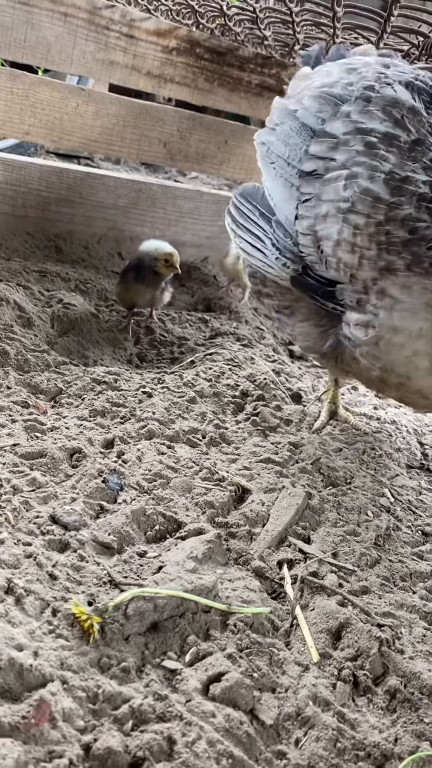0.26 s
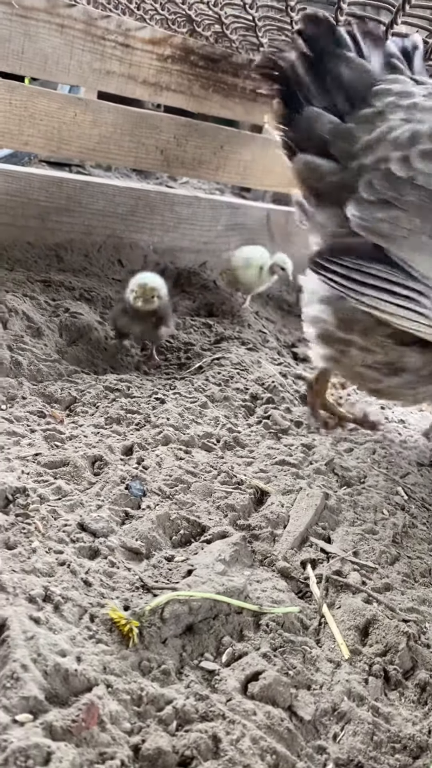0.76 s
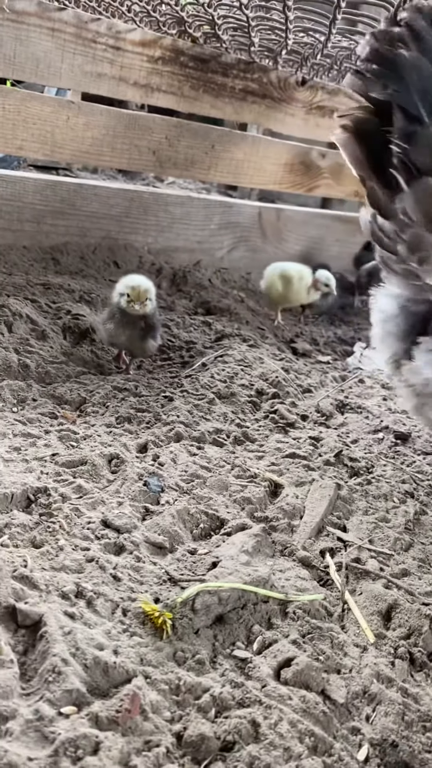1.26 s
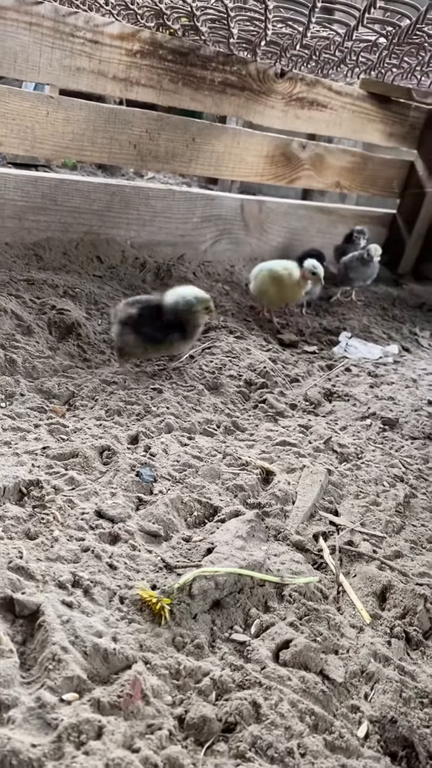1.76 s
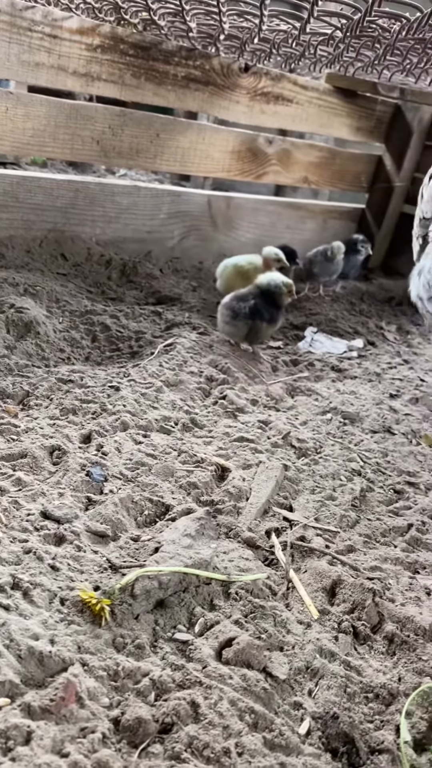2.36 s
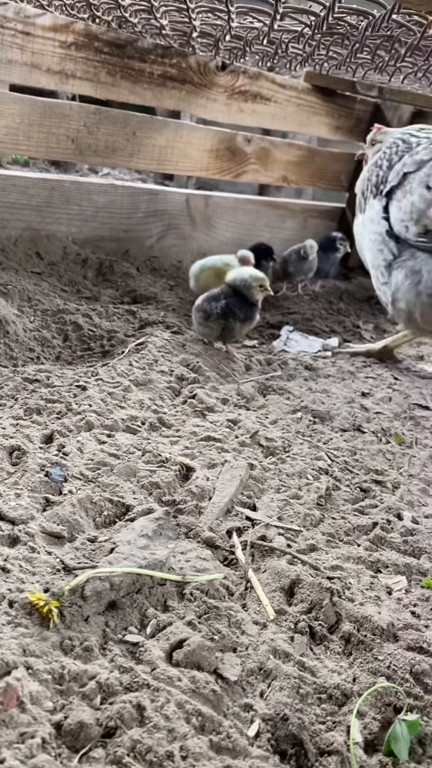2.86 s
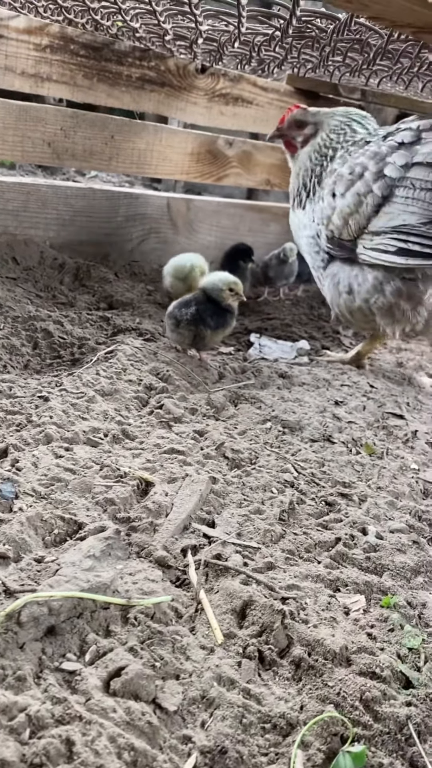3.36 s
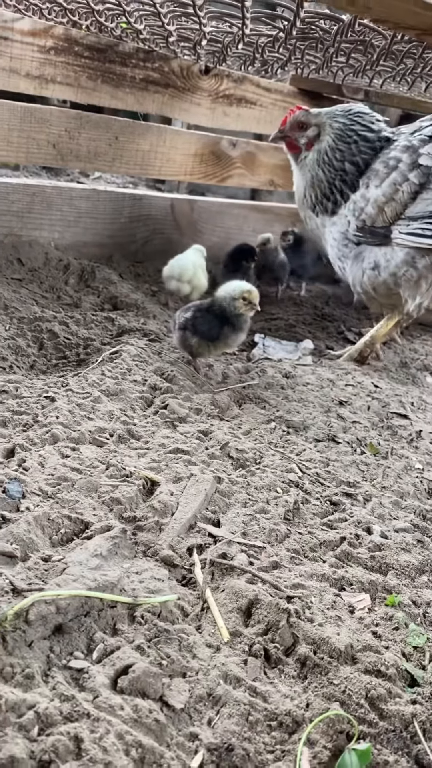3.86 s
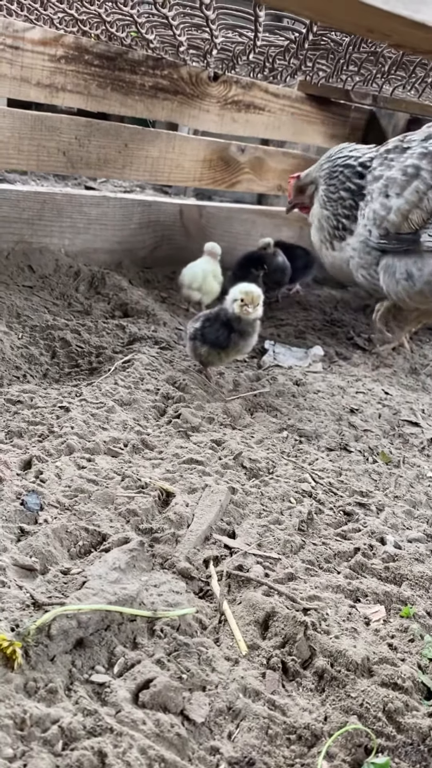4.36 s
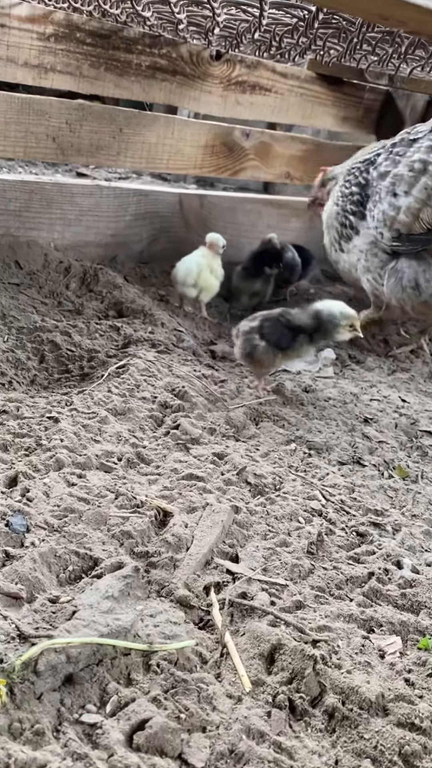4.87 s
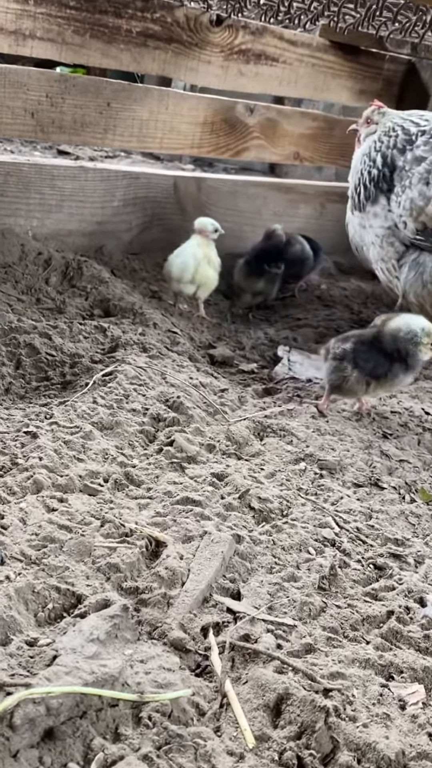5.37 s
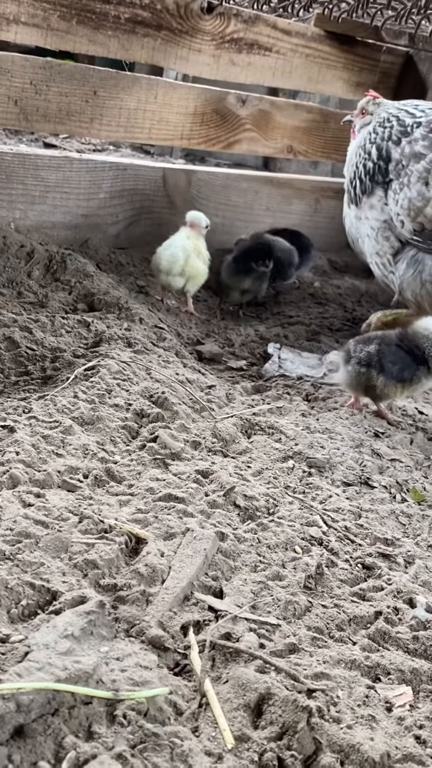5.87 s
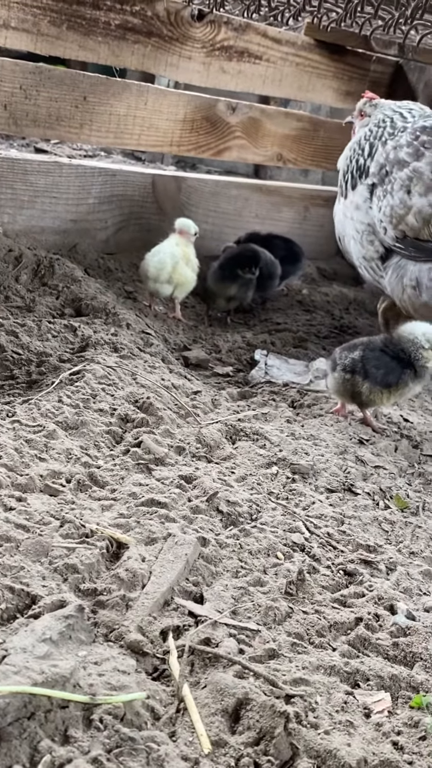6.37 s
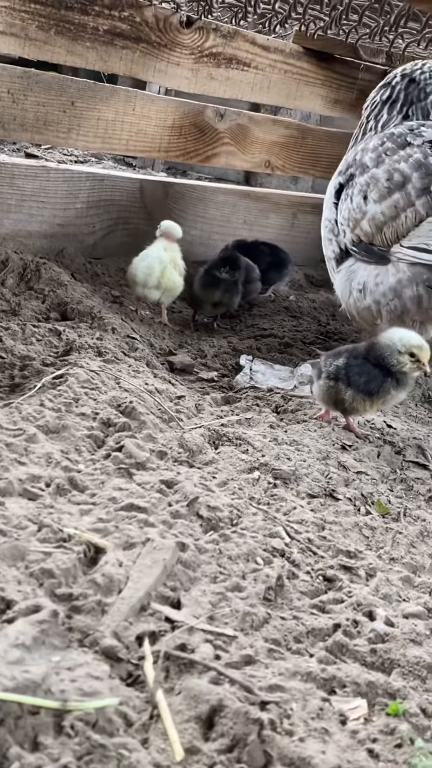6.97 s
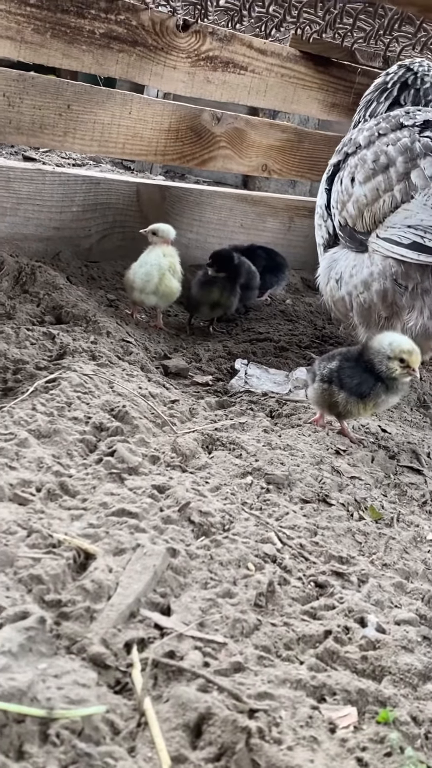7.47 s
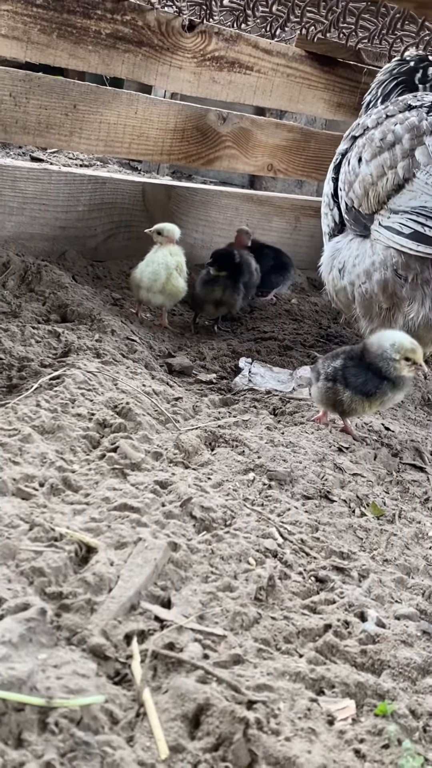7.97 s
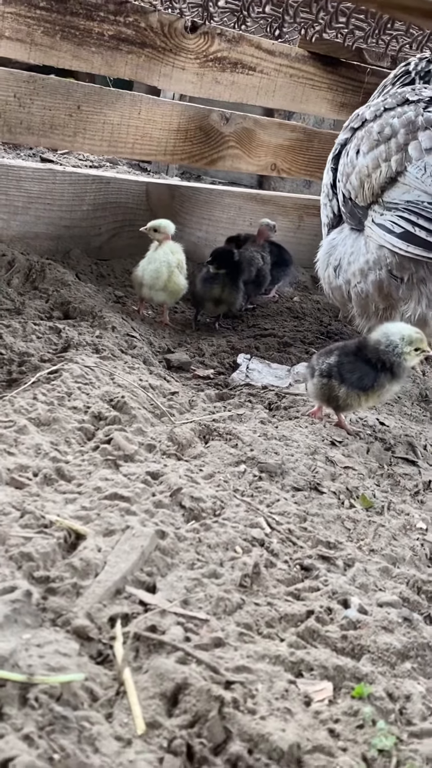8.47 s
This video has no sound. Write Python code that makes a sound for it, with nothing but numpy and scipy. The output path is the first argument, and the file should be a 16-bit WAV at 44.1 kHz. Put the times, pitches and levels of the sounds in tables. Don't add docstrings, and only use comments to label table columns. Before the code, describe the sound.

From 0 to 1.9 seconds, chicks close to the microphone make brief high trills, upward flicks and quick scooping chirps, mixed with crisp beak pecks on dry grit and small claw knocks, over soft airy yard noise. Around 1.6 to 2.0 seconds, dull toe taps cross the sand. From 2 to 3.5 seconds come piercing, slightly raspy falling cries, leaning left, with short reflections from the boards. The sound fades to silence by about 3.7. At 4.35 a different ambience cuts in: deep wind rumble and a very faint motor hum. A hen clucks low and throaty from 4.4, repeatedly until about 8.3, while chicks call in falling arches on the right. A distant rooster crows faintly near 4.6 and 8.0. Peeping thickens after 6, sand scratches softly, and from 7.6 a faint crowd of chicks joins until the end at about 8.7.

```python
import sys
import numpy as np
from scipy import signal
from scipy.io import wavfile
from scipy.ndimage import uniform_filter1d

SR = 44100
rng = np.random.default_rng(int(sys.argv[2]) if len(sys.argv) > 2 else 0)


def voltage_ratio(level):
    return 10 ** (np.asarray(level, float) / 20)


def master(y):
    cut = np.clip(np.atleast_2d(y).T, -1, 1)
    pcm = np.round(cut * 32767)
    wavfile.write(sys.argv[1], SR, pcm.astype(np.int16))


N = 384993
SPLICE_S = 4.0

# start_s, glide_length_s, from_hz, to_hz, level_db
TRILLS = [(.026, 0.033, 3586, 3650, -23), (.941, .037, 3540, 3613, -19.5)]
WARBLES = [(.167, .018, 2760, 3000, -36)]
WHISTLES = [(.527, .041, 3215, 3270, -28)]
CLIMBS = [(.742, 0.056, 3300, 4210, -23.5)]
FLICKS = [(.104, 0.0024, 2350, 2420, -31), (.375, 0.028, 2970, 2558, -18), (.496, 0.026, 3140, 2990, -32.5),
          (.664, 0.023, 3600, 3500, -40), (1.756, 0.031, 2990, 2706, -27.5)]
LEAPS = [(1.056, 0.0067, 2630, 2196, -29), (1.212, 0.024, 3160, 3220, -31.5),
         (1.279, 0.0028, 2730, 2780, -44.5)]
DIPS = [(2.2, .034, 2750, 3350, -38), (0.93, .01, 2750, 3600, -30), (1.05, .009, 3600, 3200, -36)]
SCOOPS = [(1.848, 0.031, 3720, 2720, -21.5), (.69, 0.033, 3430, 2640, -34.5),
          (.918, 0.041, 4000, 2680, -31.5)]
CURLS = [(2.428, .036, 2850, 3350, -43), (1.04, .012, 2900, 3600, -38)]
SHOULDERS = [(2.184, .052, 3410, 2760, -30), (2.369, .055, 3740, 2800, -30.5)]
STEPS = [(3.005, 0.08, 5500, 2690, -27.5)]
SIGHS = [(2.012, 0.023, 3300, 2580, -16)]
CRIES = [(2.75, 0.1, 4620, 3663, -20), (3.065, .1, 4614, 3614, -21), (3.365, 0.12, 4590, 3623, -27)]
FIRST_CRIES = [(2.175, 0.086, 4557, 3607, -17), (2.455, .098, 4635, 3588, -17)]
SWOOPS = [(2.098, .067, 5100, 2950, -29.5)]
PLAINTS = [(1.966, .066, 3720, 3380, -17)]
PURRS = [(1.716, 0.034, 3000, 2950, -39)]
HAZE = [(8.21, .07, 4500, 4400, -50), (8.24, .06, 4250, 4150, -50), (7.74, .04, 4400, 4300, -40),
        (.775, .03, 4200, 4550, -40)]
WHINES = [(2.87, 0.043, 3800, 3044, -29)]
# start_s, glide_length_s, from_hz, to_hz, level_db
BROKEN_ARCHES = [(7.152, .157, 4250, 2280, -25)]
HOOKS = [(6.525, 0.095, 3980, 2810, -29), (7.648, .075, 3470, 2700, -34)]
ARCHES = [(6.745, 0.1118, 3900, 2300, -25), (5.748, 0.122, 4320, 2300, -28)]
BOWS = [(4.875, 0.11, 4070, 2374, -28), (7.42, 0.11, 3926, 2234, -24.5), (7.731, .107, 4114, 2480, -25)]
FAR_ARCHES = [(4.385, 0.12, 4400, 3000, -58), (8.495, .088, 4000, 2480, -39)]
FAR_BOWS = [(5.435, 0.135, 3400, 2530, -39.5), (5.675, 0.14, 3680, 2520, -35.5),
            (8.33, 0.11, 3640, 2200, -32)]
LEDGES = [(4.639, .098, 3900, 2690, -30), (5.466, .13, 4230, 2600, -31)]
PIPS = [(6.067, 0.075, 3650, 2880, -37), (6.212, 0.08, 3680, 2900, -36), (7.036, .068, 3540, 2950, -38),
        (6.906, .058, 2860, 2480, -32), (8.083, .068, 3580, 2240, -32), (6.674, .052, 3520, 2420, -32),
        (6.41, .04, 3320, 2680, -33), (6.533, .046, 3420, 2740, -31)]
RISES = [(4.455, .055, 2480, 2800, -43), (6.765, .042, 2540, 2700, -29), (6.74, .012, 2400, 3500, -36),
         (7.82, .05, 3800, 4100, -38), (8.705, .022, 3200, 3750, -36), (8.645, .035, 3500, 3480, -40)]
SLIDES = [(8.43, .11, 4300, 2350, -35), (8.612, .094, 4400, 2280, -31), (8.105, .105, 4180, 2300, -29)]
LOW_SCOOPS = [(6.507, .04, 3050, 2480, -32.5), (8.578, .075, 3350, 2620, -37),
              (8.304, .052, 2950, 2450, -30.5)]
CHIRPS = [(4.348, 0.04, 2650, 2560, -34), (4.505, .03, 2800, 2620, -41), (7.164, 0.045, 3000, 2680, -31),
          (7.326, 0.04, 3130, 2700, -34.5), (7.385, 0.12, 3350, 2850, -41), (7.669, 0.025, 3890, 3600, -38),
          (7.75, 0.05, 3300, 2400, -30), (7.7, 0.03, 3550, 3180, -34), (7.868, 0.056, 3760, 3110, -29),
          (7.937, 0.048, 3350, 2600, -33), (8.0, .04, 3250, 2700, -40), (8.195, 0.058, 3780, 2800, -31),
          (8.272, 0.03, 3300, 2164, -37), (8.358, .034, 3150, 2480, -34), (8.458, .034, 3120, 2494, -39),
          (8.308, .045, 3900, 3250, -35)]
FADES = [(6.47, .03, 2500, 3300, -39.5), (5.755, .025, 2610, 2730, -35.5), (7.535, 0.07, 2830, 2780, -38),
         (7.927, 0.043, 2700, 2150, -28), (8.246, 0.032, 2720, 2230, -29), (6.7, .04, 3100, 2760, -48)]
# share_of_length, share_of_way_between_pitches, level_db
EVEN = [(0, 0.088, -6), (.4, 0.47, -3), (1, 0.96, -0.5)]
SWELL = [(0, 0, -26), (.3, .22, -24), (.38, .32, -8.5), (.6, .5, -7), (.8, .66, -5), (1, 0.96, 1.5)]
HUMP = [(0, 0, -13), (.5, 0.54, -2), (0.998, 1, -9)]
DYING = [(0, 0, -3), (0.398, .45, -3), (1, 1, -18.5)]
EARLY_TOP = [(0, .6, -13), (.08, .12, -7), (.2, 0.014, -6), (.64, .33, -1.5), (1, 0.97, -1.5)]
LATE_TOP = [(0, .45, -15), (.1, 0.079, -8), (.36, 0.012, -6.5), (.7, .36, -2.5), (1, 0.99, -5)]
TALL_TOP = [(0, .85, -12), (.1, .15, -6), (.22, 0, -4), (.64, .45, -1), (1, 1, -4)]
ROUND_TOP = [(0, .12, -9.5), (.22, 0.025, -3.5), (1, 1, -0.5)]
STAIR = [(0, 0, -10), (.18, .4, 0), (.5, 0.42, -5), (1, 1, -10)]
SWOOP = [(0, 0, -30.5), (.2, .44, -5), (.6, .66, 1), (1, 1, -5)]
STEP_DOWN = [(0, 0.04, -30), (.47, .43, -18), (.57, .64, -1.5), (.75, .75, 0), (1, 1, -6)]
SHOULDER = [(0, 0.018, -2.5), (.75, .38, 0.5), (1, 1, -5.5)]
SCOOP = [(0, 0, -13), (.3, .55, -1), (.55, .85, 0.5), (1, 1, -11)]
SLIDE = [(0, 0, -7), (.2, .1, -5), (.65, .38, -3), (1, 1, -1)]
PLAINT = [(0, 0, -10), (.2, .25, -3), (.4, .45, -7), (.75, .75, 0), (1, 1, -5)]
BROKEN = [(0, .6, -13), (.09, 0, -7), (.32, .13, -2), (.47, .24, -7), (.53, .3, -20), (.6, .35, -2),
          (.7, .45, 0), (.82, .7, -2), (1, 1, -4)]
CURL = [(0, .1, -6), (.5, 0, -2), (1, 1, 0)]
# time_after_glide_s, step_from_last_pitch_hz, level_db
FLICK_AND_DROP = [(.013, 748, -8), (.019, 497, -7.5), (0.029, -800, -9)]
FLICK = [(.013, 752, -1.5), (0.02, 595, -6)]
LEAP = [(.012, 1300, -6), (.018, 1050, -14)]
PLUNGE = [(.008, -450, -5.5), (.019, -1150, -8.5), (.034, -1450, -22)]
SHORT_PLUNGE = [(.008, -500, -5), (.017, -1030, -9.5), (.034, -1200, -24)]
HOOK = [(.02, -170, -2.5), (.045, -330, -11)]
STOP = [(.01, -46, -26)]
UPTURN = [(0.019, 39.7, -29)]
DROP = [(.012, -800, -13)]
LEDGE = [(.018, 30, -2), (.04, -150, -4), (.048, -200, -22)]
SAG = [(.008, -200, -9), (.02, -560, -15), (.032, -620, -28)]

TRILL, CRY, LATER, FALL = range(4)
# octave_partial_db, pitch_shiver_rad, send_to_boards_db
KINDS = [
    (-28.5, 0.062, -12),
    (-7.5, 0.15, 0),
    (-21.5, 0.24, -3.5),
    (-17, .08, -7),
]
THIRD_DB = (-4.5, -26, -23, -21.5)
# pitch_hz, slope_hz_per_db
BEAK_HZ, BEAK_HZ_PER_DB = (3000, 2800, 3300, 3300), (80.0, 200.0, 61, 120.0)
OVERTONE_SPREAD_DB = (2.5, 1.2, 3.5, 1.5)
# delay_s, level_db
SLAPS = [(0.0036, -21.5), (.0065, -9.5), (.005, -9), (.004, -19)]
# calls, glide, ending, kind, left_minus_right_db, second_membrane_beat_depth
FLOCK = [
    (TRILLS, EVEN, FLICK_AND_DROP, TRILL, -1.4, 1.4), (WARBLES, EVEN, FLICK_AND_DROP, TRILL, -1.5, 1.3),
    (WHISTLES, EVEN, FLICK_AND_DROP, TRILL, -2, 0), (CLIMBS, STAIR, DROP, TRILL, -1, 0.32),
    (FLICKS, EVEN, FLICK, TRILL, -1.5, 0), (LEAPS, EVEN, LEAP, TRILL, -1.3, 0),
    (DIPS, HUMP, [], FALL, -1.6, 0), (SCOOPS, SCOOP, [], FALL, -1.6, 0),
    (CURLS, CURL, DROP, TRILL, -2, 0), (BROKEN_ARCHES, BROKEN, STOP, LATER, -16, .45),
    (SHOULDERS, SHOULDER, [], TRILL, -2.5, .3), (STEPS, STEP_DOWN, [], FALL, 12, 0),
    (SIGHS, DYING, [], FALL, -3.5, 0), (CRIES, SWELL, PLUNGE, CRY, 4.1, .6),
    (FIRST_CRIES, SWELL, SHORT_PLUNGE, CRY, 5, .55), (SWOOPS, SWOOP, [], FALL, 13, 0),
    (PLAINTS, PLAINT, SAG, CRY, 9, 0), (PURRS, EVEN, STOP, TRILL, -2, 2.5),
    (HAZE, HUMP, [], LATER, -8, 1.8), (WHINES, HUMP, STOP, FALL, 8.1, 0),
    (HOOKS, EARLY_TOP, HOOK, LATER, -16, 0.71), (ARCHES, EARLY_TOP, STOP, LATER, -16, 0.51),
    (BOWS, LATE_TOP, STOP, LATER, -18, 0.9), (FAR_ARCHES, EARLY_TOP, STOP, LATER, -24, 0),
    (FAR_BOWS, LATE_TOP, STOP, LATER, -14.5, 0), (LEDGES, EARLY_TOP, LEDGE, LATER, -16.5, .64),
    (PIPS, TALL_TOP, STOP, LATER, -19, 0), (RISES, EVEN, STOP, LATER, -18, .3),
    (SLIDES, SLIDE, STOP, LATER, -16, .7), (LOW_SCOOPS, SCOOP, [], LATER, -20, 0),
    (CHIRPS, ROUND_TOP, UPTURN, LATER, -22, 0), (FADES, DYING, [], LATER, -23, 0)]

# start_s, peak_db, length_s
CLUCKS = [(4.44, -43, .05), (4.815, -41, 0.11), (5.04, -36.5, 0.11), (5.277, -37.5, 0.082),
          (5.503, -38.5, 0.071), (5.728, -38.5, 0.088), (5.947, -38.5, 0.16), (6.221, -38.5, 0.07),
          (6.475, -31, 0.094), (6.74, -39.5, 0.064), (7.024, -37.5, 0.2), (7.548, -36, 0.093),
          (7.794, -39.5, 0.17), (7.895, -30.5, 0.16), (7.999, -36, 0.19), (8.138, -36, 0.15)]
# centre_hz, width_hz, level_db
THROAT = [(750, 320, 11.5), (1070, 165, 16.5), (1404, 450, 9.5)]
# start_s, peak_db
TICKS = [(0.404, -41.5), (0.556, -45), (0.7257, -41.5), (0.7934, -34.5), (1.0963, -39), (2.816, -47.5),
         (3.3196, -55), (3.3485, -56.5), (3.5624, -51.5), (3.613, -66), (3.653, -71)]
# start_s, peak_db
RUSTLES = [(0.6175, -56), (1.592, -57), (5.1091, -50), (6.3729, -47), (7.427, -55), (8.05, -56),
           (8.6827, -41.5)]
# start_s, peak_db
PECKS = [(0.0014, -34), (0.0154, -26.5), (0.2223, -34), (0.361, -34), (0.632, -33), (.642, -35),
         (.318, -38), (.282, -41), (0.8297, -32.5), (1.457, -37), (1.5907, -38), (1.6101, -26),
         (1.679, -29.5), (3.3104, -46), (3.6734, -69)]
# start_s, peak_db
TOES = [(1.601, -32), (1.754, -38), (1.887, -37), (1.903, -38.5), (1.944, -43), (2.02, -39.5), (2.039, -33)]
# time_s, level_db
SAND = [(4.347, -70), (5.3, -66), (6.3, -57), (8.73, -54)]
# time_s, pitch_hz, level_db
CROWS = [
    [(4.54, 530, -71), (4.76, 545, -73), (4.8, 592, -62), (4.95, 593, -58.5), (5.12, 590, -62)],
    [(7.97, 657, -58), (8.02, 596, -52), (8.13, 622, -53.5), (8.22, 660, -51.5)],
]
CROW_DB = (0, 7, -4, -2)
# time_s, level_db
YARD = [
    [(0, -50), (2.3, -51), (2.9, -55), (3.3, -60), (3.55, -68), (3.72, -82.5)],
    [(4.345, -56), (4.75, -52.5), (5.4, -50.5), (8.73, -47)],
]
# frequency_hz, density_db_per_hz
AIR = [
    [(18, -40.5), (30, -10.5), (271, -2.5), (413, 0.5), (931, -1.5), (1790, -5), (5540, -8.5), (15800, -13)],
    [(18, -60), (30, -0.5), (566, -12), (645, -6.5), (1060, -7.5), (3540, -14), (3940, -22.5), (12800, -46),
     (15800, -58)],
]
# frequency_hz, likeness
LIKENESS = [(40, 0.5), (85, 0.75), (500, .62), (5000, 0.49), (14000, 0.064)]


def rms_one(x):
    return x / np.sqrt(np.mean(x ** 2) + 1e-20)


def at_hz(points, hz):
    point_hz, values = np.transpose(points)
    return np.interp(np.log(hz), np.log(point_hz), values)


def drift(rate, size):
    step = max(int(SR / rate / 2), 1)
    knots = np.repeat(rng.standard_normal(size // step + 1), step)[:size]
    return np.sqrt(2) * uniform_filter1d(uniform_filter1d(knots, step), step)


def resonance(x, hz, width_hz):
    r = np.exp(-np.pi * width_hz / SR)
    poles = [1, -2 * r * np.cos(2 * np.pi * hz / SR), r * r]
    return signal.lfilter([(1 - r * r) / 2, 0, (r * r - 1) / 2], poles, x)


def steep_resonance(x, hz, width_hz):
    return resonance(resonance(x, hz, width_hz), hz, width_hz)


def add(out, s, sound, side_db):
    i = round(s * SR)
    gains = voltage_ratio(np.array([side_db, -side_db]) / 2)
    gains = gains / np.sqrt(np.mean(gains ** 2))
    out[:, i:i + len(sound)] += np.outer(gains, sound[:N - i])


def glide(rows, edge_s, round_s):
    s, hz, db = np.transpose(rows)
    t = np.arange(s[0] - edge_s, s[-1] + edge_s, 1 / SR)
    pitch = uniform_filter1d(np.interp(t, s, hz), int(round_s * SR), mode="nearest")
    ends = np.clip(np.minimum(t - t[0], t[-1] - t) / (2 * edge_s), 0, 1) ** 2
    return t, 2 * np.pi * np.cumsum(pitch) / SR, np.sqrt(2) * voltage_ratio(np.interp(t, s, db)) * ends


def contour(call, way, ending):
    s, length, from_hz, to_hz, db = call
    rows = []
    for share, along, step_db in way:
        rows.append((s + share * length, from_hz + along * (to_hz - from_hz), db + step_db))
    for after, step_hz, step_db in ending:
        rows.append((s + length + after, to_hz + step_hz, db + step_db))
    return rows


def membrane_beat(t, phase, pitch, way, flutter):
    beat_hz = 436 if t[0] < SPLICE_S else 321
    beat = 2 * np.pi * beat_hz * t + 2.0 * drift(59.97, len(t))
    sliding = (pitch.max() - pitch) * (2.4 if way is SWELL else t > t.mean())
    depth = flutter * voltage_ratio(-9.5) * np.clip(1.4 - sliding / 700, 0, 1)
    sidebands = np.sin(phase + beat) + 0.2 * np.sin(phase - beat) + 0.21 * np.sin(phase + 2 * beat)
    octave = np.sin(2 * phase + 2 * beat) + np.sin(2 * phase + 3 * beat)
    return depth * (sidebands + voltage_ratio(-27.0) * octave)


def strained_breath(t, level, call_db):
    rasp_hz, rasp_width_hz, rasp_s, rasp_db = 4740, 520, 0.012, -21
    age = (t - t[0]) / rasp_s
    puff = age * np.exp(1 - age) * voltage_ratio(rasp_db + call_db)
    high_puff = puff * voltage_ratio(-15)
    breath, air = rng.standard_normal((2, len(t)))
    rasp = rms_one(steep_resonance(breath, rasp_hz, rasp_width_hz)) * (puff + level * voltage_ratio(-37))
    hiss = rms_one(steep_resonance(air, 5800, 1700)) * (level * voltage_ratio(-35) + high_puff)
    rasp_octave = rms_one(steep_resonance(air, 2 * rasp_hz, rasp_width_hz)) * high_puff
    return rasp + hiss + rasp_octave


def chick_call(call, way, ending, kind, flutter):
    octave_db, shiver, _ = KINDS[kind]
    t, phase, level = glide(contour(call, way, ending), edge_s=.004, round_s=.006)
    pitch = np.gradient(phase) * SR / (2 * np.pi)
    over_db = octave_db - np.clip(pitch - BEAK_HZ[kind], 0, None) / BEAK_HZ_PER_DB[kind]
    over_db = over_db + OVERTONE_SPREAD_DB[kind] * drift(45, len(t))
    if t[0] > SPLICE_S:
        over_db = over_db + .6 * (call[-1] + 28)
    phase = phase + shiver * drift(300, len(t))
    voice = np.sin(phase) + voltage_ratio(over_db) * np.sin(2 * phase)
    voice += voltage_ratio(over_db + THIRD_DB[kind]) * np.sin(3 * phase)
    voice += membrane_beat(t, phase, pitch, way, flutter)
    voice *= level * voltage_ratio(10.0 * shiver * drift(119.2, len(t)))
    if way is SWELL:
        voice += strained_breath(t, level, call[-1])
    return t[0], voice


def crowd(count):
    chance = rng.uniform(-1, 1, (count, 4))
    s = np.linspace(7.62, 8.66, count) + .025 * chance[:, 0]
    top_hz = 3700 + 450 * chance[:, 1]
    length_s = .06 + .02 * chance[:, 2]
    return np.transpose([s, length_s, top_hz, .72 * top_hz, -51 + 3.5 * chance[:, 3]])


def chicks():
    out, send = np.zeros((2, 2, N))
    far_end = (crowd(count=34), EARLY_TOP, STOP, LATER, -10.0, .8)
    for calls, way, ending, kind, side_db, flutter in FLOCK + [far_end]:
        slap_s, slap_db = SLAPS[kind]
        send_db = KINDS[kind][2]
        for call in calls:
            s, voice = chick_call(call, way, ending, kind, flutter)
            add(out, s, voice, side_db)
            add(out, s + slap_s, voice * voltage_ratio(slap_db), side_db)
            add(send, s, voice * voltage_ratio(send_db), 0)
    return out, send


def hen():
    out = np.zeros((2, N))
    for s, db, length in CLUCKS:
        t = np.arange(0, 1.3 * length, 1 / SR)
        cycles = np.cumsum(208.0 * (1 + 0.024 * drift(39, len(t)))) / SR
        pulses = np.diff(np.floor(cycles), prepend=0)
        source = pulses + 0.07 * rng.standard_normal(len(t))
        voice = np.zeros(len(t))
        for k, (hz, width_hz, gain_db) in enumerate(THROAT):
            voice += (-1) ** k * voltage_ratio(gain_db) * steep_resonance(source, hz, width_hz)
        shape = np.minimum(t / 0.0027, 1) * np.exp(-(t / length) ** 2 * 1.37)
        add(out, s, rms_one(voice) * shape * voltage_ratio(db - 11.0), 1.5)
    return out


def feet():
    out = np.zeros((2, N))
    for s, db in TICKS:
        t = np.arange(0, .02, 1 / SR)
        knock = rng.standard_normal(len(t)) * np.exp(-t / .0012)
        knock = resonance(resonance(knock, 1470, 1800), 2200, 3200) + 0.13 * resonance(knock, 5000, 6000)
        add(out, s, knock / np.abs(knock).max() * voltage_ratio(db + 11.0), -1.5)
    for s, db in RUSTLES:
        t = np.arange(0, .1, 1 / SR)
        grit = rng.standard_normal((2, len(t))) * voltage_ratio(3.4 * drift(700, len(t)))
        shape = np.sin(np.pi * np.sqrt(t / t[-1])) ** 2
        hiss = rms_one(resonance(grit, 3600, 8500)) * shape * voltage_ratio(db + 3.5)
        i = round(s * SR)
        out[:, i:i + len(t)] += hiss[:, :N - i]
    return out


def grit_ticks():
    out, t = np.zeros((2, N)), np.arange(0, .015, 1 / SR)
    for rows, hz, width_hz, decay_s in [(PECKS, 5000, 4500, .0015), (TOES, 800, 1200, .002)]:
        for s, db in rows:
            tick = resonance(rng.standard_normal(len(t)) * np.exp(-t / decay_s), hz, width_hz)
            add(out, s, tick / np.abs(tick).max() * voltage_ratio(db - 3.0), -1.5)
    return out


def wooden_run(x):
    near_t60_s, far_t60_s, far_db = 0.12, .19, -8
    t = np.arange(int(far_t60_s * SR)) / SR
    decay = voltage_ratio(-60 * t / near_t60_s) + voltage_ratio(far_db - 60 * t / far_t60_s)
    tail = rng.standard_normal((2, len(t))) * decay * np.clip(t / 0.0015 - .5, 0, 1)
    tail = signal.lfilter([1], [1, -.45], tail)
    tail /= np.sqrt(np.sum(tail ** 2, axis=1, keepdims=True))
    return signal.fftconvolve(x, tail, axes=1)[:, :N]


def sand(peeps):
    calling = uniform_filter1d(np.sum(peeps ** 2, axis=0), int(.06 * SR))
    gate = voltage_ratio(9.3 * np.clip(np.sqrt(np.abs(calling)) / voltage_ratio(-37.0), 0, 1) - 4.0)
    s, db = np.transpose(SAND)
    grit = rng.standard_normal((2, N)) * voltage_ratio(1.8 * drift(440, N) + 1.3 * drift(7.3, N))
    level = voltage_ratio(np.interp(np.arange(N) / SR, s, db + 1.0, left=-200))
    return rms_one(resonance(grit, 6730, 8700)) * level * gate * voltage_ratio(np.array([[-1.5], [1.5]]))


def far_cock():
    out = np.zeros((2, N))
    for rows in CROWS:
        t, phase, level = glide(rows, edge_s=0.027, round_s=0.025)
        phase += 0.15 * drift(90, len(t))
        voice = sum(voltage_ratio(db) * np.sin((k + 1) * phase) for k, db in enumerate(CROW_DB))
        add(out, t[0], voice * level * voltage_ratio(2.4 * drift(30.3, len(t))), -2.5)
    return out


def yard():
    t = np.arange(N) / SR
    bands, together = [0, 0], drift(9, N)
    edges = 22 * 2 ** np.arange(0, 9.6, .5)
    white = rng.standard_normal((2, 2, N))
    for k, (low, high) in enumerate(zip(edges, edges[1:])):
        band_pass = signal.butter(2, [low, high], "band", fs=SR, output="sos")
        mid, side = signal.sosfilt(band_pass, white[k % 2])
        hz = np.sqrt(low * high)
        alike = np.clip(at_hz(LIKENESS, hz), 0, 1)
        band = np.sqrt(1 + alike) * mid + np.sqrt(1 - alike) * side * [[1], [-1]]
        band = band * voltage_ratio(1.2 * together + 2.5 * drift(31, N))
        bands = [bands[take] + voltage_ratio(at_hz(AIR[take], hz)) * band for take in range(2)]
    out, edge_s = np.zeros((2, N)), .012
    for rows, noise in zip(YARD, bands):
        s, db = np.transpose(rows)
        fade = np.clip(np.minimum(t - s[0] + edge_s, s[-1] + edge_s - t) / edge_s, 0, 1)
        out += rms_one(noise) * voltage_ratio(np.interp(t, s, db)) * fade
    return out


def drone():
    hum = rms_one(steep_resonance(rng.standard_normal(N), 86.4, 19))
    return hum * voltage_ratio(-64.5) * np.clip((np.arange(N) / SR - 4.345) / .012, 0, 1)


def scene():
    peeps, send = chicks()
    near = hen() + feet() + grit_ticks()
    boards = voltage_ratio(-6.5) * wooden_run(send + near)
    return peeps + near + boards + sand(peeps) + far_cock() + yard() + drone()


def masked(x):
    from_hz, band_hz, slope_db_per_khz, deepest_db = 3900, 350, 5.5, -48.0
    hz, s, spectra = signal.stft(x, SR, nperseg=2048)
    second = s > SPLICE_S
    band = (hz // band_hz).astype(int)
    starts = np.flatnonzero(np.diff(band, prepend=-1))
    peaks = np.maximum.reduceat(np.abs(spectra).max(axis=0), starts, axis=0)
    slope = voltage_ratio(slope_db_per_khz * hz[starts, None] / 1000)
    hidden = voltage_ratio(-27.5 + 4.0 * second) * np.maximum.accumulate(peaks * slope, axis=0) / slope
    heard = peaks > np.maximum(hidden, voltage_ratio(deepest_db) * peaks.max(axis=0))
    kept = heard[band] | (hz < from_hz)[:, None]
    chance = rng.random((len(starts), kept.shape[1] // 2 + 1))
    chance = np.repeat(chance, 2, axis=1)[band, :kept.shape[1]]
    lost_per_khz = np.where(second, .09, .03)
    kept &= chance > lost_per_khz * np.clip(hz - 10500, 0, None)[:, None] / 1000
    return signal.istft(spectra * kept, SR, nperseg=2048)[1][:, :N]


def band_limit(x):
    return signal.sosfilt(signal.butter(12, 16110, fs=SR, output="sos"), x)


def record(dry):
    top_cut = signal.cheby2(10, 50, 16050, fs=SR, output="sos")
    offset = voltage_ratio(-64.5) * (np.arange(N) > 4.1 * SR)
    mix = masked(signal.sosfilt(top_cut, dry)) + offset
    return band_limit(mix)


dry = scene()
out = record(dry)
master(out)
```